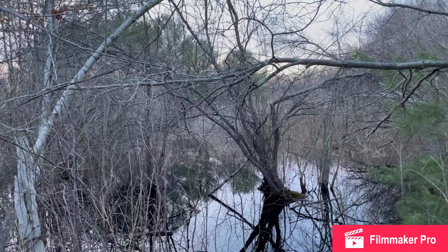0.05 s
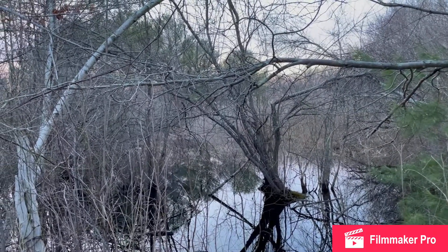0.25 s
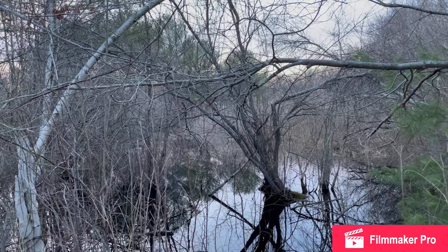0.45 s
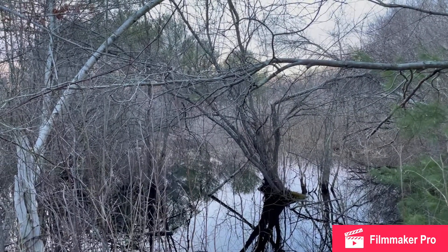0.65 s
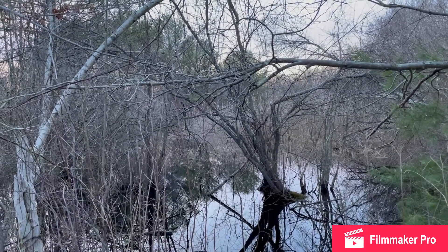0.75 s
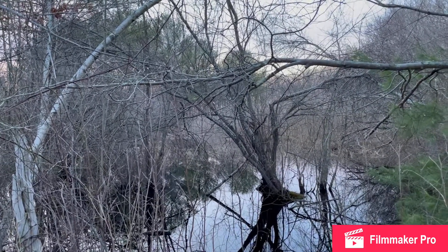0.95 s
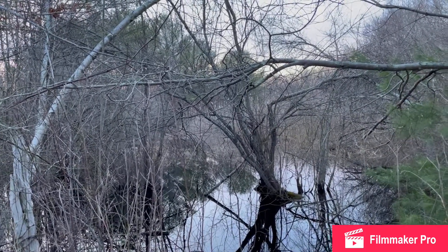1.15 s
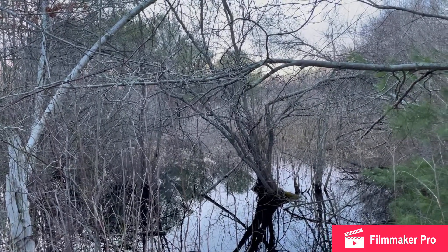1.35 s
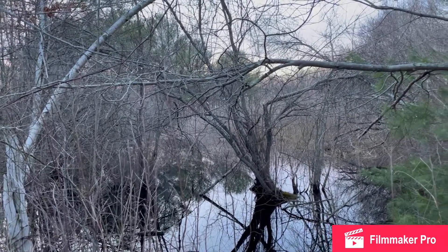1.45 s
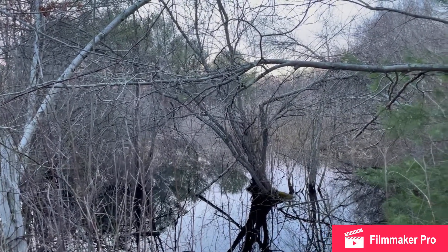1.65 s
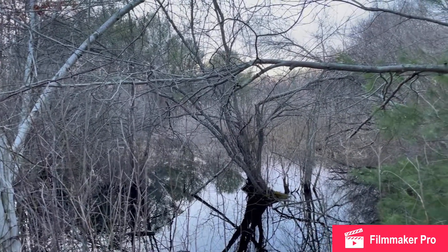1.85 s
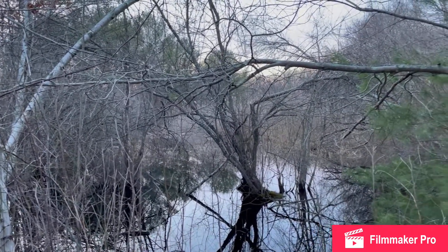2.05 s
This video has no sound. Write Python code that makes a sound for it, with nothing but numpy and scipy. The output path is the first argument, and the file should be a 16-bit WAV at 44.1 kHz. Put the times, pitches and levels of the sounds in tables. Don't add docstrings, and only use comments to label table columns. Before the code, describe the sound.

High clear frog peeps overlap around a woodland pond, a loud pulsing trill near the middle, a distant chorus swelling and easing behind; small bird chips, tiny clicks, quiet hush and wind bumping the stereo microphone.

```python
import sys
import numpy as np
from scipy import signal
from scipy.fft import rfft, irfft, next_fast_len
from scipy.io import wavfile
from scipy.ndimage import uniform_filter1d, map_coordinates

SR = 44100
rng = np.random.default_rng(int(sys.argv[2]) if len(sys.argv) > 2 else 0)


def invert_db(level):
    return 10 ** (np.asarray(level, dtype=float) / 20)


def generate_wav(sig):
    pcm = np.round(np.clip(np.atleast_2d(sig).T, -1, 1) * 32767).astype(np.int16)
    wavfile.write(sys.argv[1], SR, pcm)


N = 92610

RELEASE_S, PEEP_FADE_S = .006, .02
BEND, SWELL_DB = .9, 6
WET_DB = -12
BIRD_WET_DB = -8


def unit(x):
    return x / np.sqrt(np.mean(x ** 2) + 1e-20)


def along(points, hz):
    f, v = np.transpose(points)
    return np.interp(np.log(hz + 1), np.log(f + 1), v)


def curve(rows):
    return np.interp(np.arange(N) / SR, *np.transpose(rows))


def wobble(rate):
    knots = rng.standard_normal(int(N * rate / SR) + 4)
    return map_coordinates(knots, [np.arange(N) * rate / SR])


def filtered(x, response):
    m = next_fast_len(N + 8192)
    return irfft(rfft(x, m) * response(np.fft.rfftfreq(m, 1 / SR)), m)[..., :N]


def sides(mid, side):
    return np.array([mid + side, mid - side])


def calls(rows, voice, bend, swell_db, per_s=0, fade_s=RELEASE_S, ease=0):
    attack_s, overtone_fade_db = .012, 10
    out = np.zeros(N + 2 * SR)
    for s, length, first_hz, last_hz, db in rows:
        t = np.arange(round(length * SR)) / SR
        u = t / length
        glide = (1 - ease) * u ** bend + ease * (1 - np.cos(np.pi * u)) / 2
        phase = 2 * np.pi * np.cumsum(first_hz + (last_hz - first_hz) * glide) / SR
        rise = t / min(attack_s, length / 4)
        fall = (length - t) / min(fade_s, length / 3)
        shape = np.clip(np.minimum(rise, fall), 0, 1) * invert_db(db + swell_db * (u - 1))
        if per_s:
            shape = shape * np.sin(np.pi * per_s * (length - t)) ** 4
        tone = 0
        for k, partial_db in voice:
            dulling_db = overtone_fade_db * max(k - 1, 0) * (2 * u - 1)
            tone = tone + invert_db(partial_db - dulling_db) * np.sin(k * phase)
        out[SR + round(s * SR):][:len(t)] += np.sqrt(2) * shape * tone
    unsteadiness_db = 1.2 * wobble(45) + 1.8 * wobble(170)
    return out[SR:SR + N] * invert_db(unsteadiness_db)


def woods(x, pan_db, wet_db, direct=1):
    t60_s, echo_db, alike = .5, -20, .75
    t = np.arange(SR // 2) / SR
    noise = rng.standard_normal((3, len(t)))
    diffuse = alike * noise[0] + np.sqrt(1 - alike ** 2) * noise[1:]
    tail = diffuse * invert_db(-60 * t / t60_s) * np.minimum(t / .02, 1)
    answer = invert_db(wet_db) * tail / np.linalg.norm(tail[0])
    answer[:, rng.integers(60, 500, size=4)] += direct * invert_db(echo_db) * rng.uniform(-0.59, 1, size=4)
    answer[:, 0] += direct
    gain = invert_db(np.array([[pan_db / 2], [-pan_db / 2]]))
    return signal.fftconvolve(x[None], answer, axes=1)[:, :N] * gain / gain.mean()


def frogs():
    # start in seconds, length in seconds, first Hz, last Hz, level in dB.
    peeps_ahead = [
        (-.09, .16, 2760, 3270, -46),
        (.6, .105, 2760, 3050, -43),
        (1.335, .195, 2790, 3320, -38),
        (1.68, .115, 2500, 2710, -51),
        (1.81, .075, 2620, 2730, -50),
        (1.9, .055, 3050, 3250, -55),
        (.255, .07, 2860, 2800, -50),
    ]
    peeps_near = [(.097, .155, 2710, 3270, -44)]
    peeps_right = [
        (.555, .185, 2820, 3330, -39),
        (.78, .19, 2620, 3040, -37.5),
        (1.565, .165, 2660, 3120, -42),
        (1.945, .145, 2710, 3000, -41),
        (.35, .05, 2620, 2610, -53),
        (2.065, .12, 2930, 3280, -42),
    ]
    peeps_left = [
        (1.497, .133, 2735, 3090, -40),
        (1.91, .045, 2810, 2835, -48),
        (.398, .045, 2930, 3010, -47),
    ]
    trill_right = [(.165, .355, 2700, 3090, -46)]
    trill_ahead = [(.94, .285, 2900, 3345, -33.5)]
    # multiple of the loud partial, level in dB.
    voice = [(.5, -27), (1, 0), (1.5, -28), (2, -38)]
    near_voice = [(.5, -14), (1, 0), (1.5, -20), (2, -30)]

    def peeps(rows, swell_db):
        return calls(rows, voice, BEND, swell_db, fade_s=PEEP_FADE_S, ease=.45)

    ahead = peeps(peeps_ahead, SWELL_DB) + calls(trill_ahead, voice, BEND, 16, per_s=34.5)
    ahead = ahead + calls(peeps_near, near_voice, .75, 8)
    right = peeps(peeps_right, 7.9) + calls(trill_right, voice, BEND, 3.7, per_s=31)
    left = peeps(peeps_left, 3)
    return woods(ahead, -1, WET_DB) + woods(right, -8, WET_DB) + woods(left, 5, WET_DB)


def birds():
    # start in seconds, length in seconds, first Hz, last Hz, level in dB.
    whistles = [
        (-.02, .15, 4320, 4025, -50),
        (.13, .065, 4010, 3930, -56),
        (.195, .06, 3880, 3680, -61),
        (.93, .105, 1565, 1575, -52),
        (.968, .095, 2490, 2525, -53),
        (1.05, .04, 2525, 2600, -58),
        (.78, .04, 1150, 1100, -60),
        (.88, .04, 1252, 1258, -58),
        (1.69, .04, 1050, 1045, -57),
    ]
    short_notes = [(.372, .028, 4330, 4130, -55), (.393, .02, 4130, 4380, -56),
                   (.412, .014, 4330, 4130, -57), (.42, .024, 3900, 3450, -56),
                   (.59, .018, 4020, 3920, -58), (.606, .018, 3900, 3860, -54),
                   (.848, .036, 4395, 4370, -55), (.88, .022, 4600, 4100, -61),
                   (.899, .016, 3900, 3600, -52), (1.428, .035, 4320, 4210, -54),
                   (1.458, .02, 4250, 4480, -58), (1.474, .024, 4240, 4210, -60),
                   (1.474, .022, 4450, 3550, -52), (1.637, .046, 3885, 3880, -53),
                   (1.71, .04, 3880, 3880, -62), (1.78, .07, 3880, 3900, -65)]
    pure = [(1, 0)]
    ahead = calls(whistles, pure, 0.8, 0, fade_s=PEEP_FADE_S)
    right = calls(short_notes, pure, 0.97, 0) + chips() + arch()
    return woods(ahead, -1.5, BIRD_WET_DB) + woods(right, -9, BIRD_WET_DB)


def chorus(count=60):
    # time in seconds, level in dB.
    effort = [
        (0, -47.5),
        (.25, -54.5),
        (.5, -45),
        (.75, -43),
        (1, -46.5),
        (1.15, -50),
        (1.3, -53.5),
        (1.45, -43),
        (1.75, -46),
        (2.1, -54.5),
    ]
    # multiple of the loud partial, level in dB.
    far_voice = [(.5, -24), (1, 0), (1.5, -27)]
    draw = rng.standard_normal((count, 4))
    start_s = np.linspace(-.3, N / SR, count) + .04 * draw[:, 0]
    length_s = .15 * invert_db(1.5 * draw[:, 2])
    low_hz = 2738 + 98 * draw[:, 1]
    rows = np.c_[start_s, length_s, low_hz, low_hz + 340.7, 2.5 * draw[:, 3]]
    voices = calls(rows, far_voice, BEND, SWELL_DB, fade_s=PEEP_FADE_S)
    far = woods(voices, -5, 0, direct=.03)
    return unit(far) * invert_db(curve(effort) - 2)


def wind():
    # time in seconds, strength in dB.
    gusts = [(0, -46), (.17, -48.5), (.2, -37), (.24, -49.5), (.57, -24.5), (.6, -35.5), (.66, -33.5),
             (.71, -42), (.79, -28.5), (.86, -51), (1.03, -41), (1.13, -55), (1.29, -54), (1.38, -41.5),
             (1.48, -48.5), (1.83, -44), (1.87, -49.5), (2.1, -48)]
    # frequency in Hz, density in dB per Hz.
    rumble = [(12, -33), (20, -23), (65, 3.5), (289, -23.5), (331, -47), (400, -39.5), (520, -66.5),
              (880, -120)]
    # start in seconds, peak in dB, frequency in Hz.
    eddies = [(0.36, -39, 116), (0.381, -33.5, 102.8), (0.402, -27, 111), (0.43, -37, 100),
              (0.46, -23.5, 123.4), (0.492, -18, 153), (0.538, -18, 112.5), (0.779, -38.5, 119),
              (0.832, -35, 124), (0.88, -35, 113.6), (1.009, -31, 123), (1.053, -36, 109),
              (1.368, -32, 300), (1.376, -38, 110), (1.388, -37, 105), (1.443, -40.5, 250),
              (1.455, -38, 110), (1.481, -35.5, 120), (1.491, -34, 340), (1.542, -39, 110),
              (1.557, -32, 160), (1.566, -40.5, 310), (1.663, -36.5, 180), (1.817, -36.5, 94.7),
              (2.025, -44, 167)]
    cycles, side_db = .75, -24
    mid, side = filtered(rng.standard_normal((2, N)), lambda hz: invert_db(along(rumble, hz)))
    swell = np.sqrt(np.abs(uniform_filter1d(unit(mid) ** 2, size=1500))) + .15
    buffeting = unit(sides(mid, invert_db(side_db) * side) / swell ** .6)
    buffeting = buffeting * invert_db(curve(gusts) + 1.5 * wobble(27))
    lead = 1000
    thumps, t = np.zeros(N + SR), np.arange(4000) / SR
    for s, db, hz in eddies:
        u = (t - lead / SR) * hz / cycles - .4
        push = np.exp(-4 * u ** 2) * np.cos(2 * np.pi * (cycles * u + rng.random()))
        thumps[round(s * SR):][:len(t)] += invert_db(db + 2.5) * push
    return buffeting + thumps[lead:][:N]


def patchy(spectrum, patchy_db):
    # frequency in Hz, unshared over shared level in dB.
    spread = [(100, -21), (300, -14.5), (700, -2), (1500, -7), (3000, -0.5), (7000, 0)]
    z = signal.stft(rng.standard_normal((2, N + 512)), nperseg=512)[2]
    field = uniform_filter1d(rng.standard_normal(z.shape[1:]), 6, axis=0)
    field = uniform_filter1d(field, 10, axis=1)
    pair = signal.istft(z * invert_db(patchy_db * unit(field)), nperseg=512)[1][:, :N]

    def colour(hz):
        mid_and_side_db = along(spectrum, hz) + np.array([0 * hz, along(spread, hz)])
        return invert_db(mid_and_side_db) * (hz > 25)

    return unit(sides(*filtered(pair, colour)))


def hush():
    # frequency in Hz, density in dB per Hz.
    hush_spectrum = [(30, -32), (120, -4), (500, -8.5), (1100, -11.5), (2100, -23), (3500, -14),
                     (4500, -38), (7000, -55.5)]
    rustle_spectrum = [(3000, -46.5), (3700, -11.5), (4800, 2.5), (5300, -6.5), (7000, -18.5)]
    # time in seconds, rustle in dB.
    leaves = [
        (0, -59.5),
        (.1, -79),
        (.33, -91),
        (.37, -56),
        (1.9, -60),
        (1.97, -63.5),
        (2.1, -86),
    ]
    steady = invert_db(-49) * patchy(hush_spectrum, patchy_db=1.5)
    return steady + invert_db(curve(leaves) - 5.5) * patchy(rustle_spectrum, patchy_db=2.0)


def ports(pair):
    # frequency in Hz, phase in radians by which left leads.
    lead = [(30, -.5), (90, -.62), (180, -.8), (350, -1.2), (780, -2.1), (1640, -3.5)]
    turn = np.array([[1], [-1]])
    return filtered(pair, lambda hz: np.exp(.5j * along(lead, hz) * (hz < 1800) * turn))


def air():
    hiss = [(7500, -35.0), (9000, -14.5), (10800, -9.5), (12500, -17), (14000, -63)]  # (Hz, dB per Hz)
    return invert_db(-90.5) * patchy(hiss, patchy_db=5.5)


def ticks():
    # start in seconds, frequency in Hz, peak in dB.
    clicks = [(.002, 3800, -46.5), (0.243, 1840, -51.5), (0.244, 2260, -62.5), (0.36, 2900, -54),
              (.288, 2400, -58), (0.301, 2200, -50.5), (.312, 2100, -54), (1.8, 3550, -59.5),
              (1.255, 3200, -52.5), (1.258, 2100, -45.5), (1.319, 4000, -62.5), (1.293, 5130, -67),
              (1.295, 4830, -57.5), (1.627, 4700, -49.5), (1.618, 1850, -77.5)]
    ring_s = .007
    out, t = np.zeros(N), np.arange(2000) / SR
    for s, hz, db in clicks:
        shape = invert_db(db - 60 * (t / ring_s - .4) ** 2)
        out[round(s * SR):][:len(t)] += shape * np.sin(2 * np.pi * hz * t)
    return woods(out, -1.5, -10)


def chips():
    # start in seconds, length in seconds, first Hz, last Hz, level in dB.
    chip_rows = [
        (0.353, 0.039, 5150, 6910, -69),
        (0.583, 0.03, 5270, 6400, -72),
        (0.833, 0.038, 4500, 6850, -68.5),
        (1.419, 0.042, 4900, 6910, -70.5),
        (1.622, 0.032, 4030, 6740, -66),
    ]
    rise_s, attack_s, climb_hz_per_s = .011, .003, 6900
    out = np.zeros(N)
    for s, length, first_hz, last_hz, db in chip_rows:
        t = np.arange(round(length * SR)) / SR
        hz = last_hz + (first_hz - last_hz) * np.exp(-t / rise_s) + climb_hz_per_s * t
        phase = 2 * np.pi * np.cumsum(hz) / SR
        shape = np.clip(np.minimum(t / attack_s, (length - t) / RELEASE_S), 0, 1)
        out[round(s * SR):][:len(t)] += invert_db(db + 5.5) * shape * np.sin(phase)
    return out


def croaks():
    # start in seconds, length in seconds, level in dB.
    croak_rows = [
        (1.035, 0.21, -58.5),
        (1.689, 0.27, -61),
    ]
    # frequency in Hz, density in dB per Hz.
    throat_spectrum = [(1300, -38.5), (1500, -5.5), (1600, 3.5), (1950, -14.5), (2300, -39.5)]
    t = np.arange(N) / SR
    shape = np.zeros(N)
    for s, length, db in croak_rows:
        shape += invert_db(db) * np.clip(np.minimum(t - s, s + length - t) / 0.047, 0, 1)
    throat = filtered(rng.standard_normal((2, N)), lambda hz: invert_db(along(throat_spectrum, hz)))
    return unit(throat * invert_db(2.3 * wobble(70))) * shape


def arch():
    # start in seconds, length in seconds, edge Hz, top Hz, level in dB.
    chirp = (1.235, .028, 1680, 1960, -62)
    # multiple of the fundamental, level in dB.
    harmonics = [(1, -3), (2, 1), (3, 0)]
    s, length, edge_hz, top_hz, db = chirp
    u, out = np.arange(round(length * SR)) / (length * SR), np.zeros(N)
    bow = np.sin(np.pi * u)
    phase = 2 * np.pi * np.cumsum(edge_hz + (top_hz - edge_hz) * bow) / SR
    tone = sum(invert_db(d) * np.sin(k * phase) for k, d in harmonics)
    out[round(s * SR):][:len(u)] = invert_db(db) * np.sqrt(bow) * tone
    return out


def scene():
    animals = invert_db(-.5) * frogs() + chorus() + invert_db(-1) * birds() + croaks()
    everything = animals + ticks() + ports(wind() + hush())
    top_hz, above_db = 7320, -41.5
    return filtered(everything, lambda hz: np.where(hz < top_hz, 1, invert_db(above_db))) + air()


def roll_off(x):
    return signal.sosfilt(signal.butter(12, 13500, fs=SR, output="sos"), x)


def record(dry):
    return roll_off(dry)


dry = scene()
out = record(dry)
generate_wav(out)
```